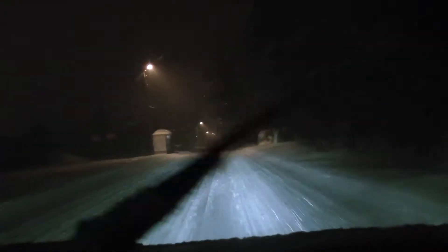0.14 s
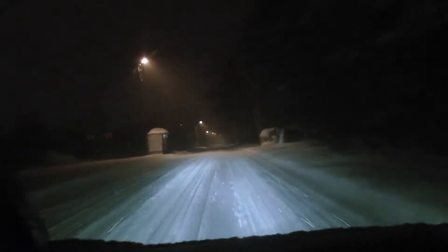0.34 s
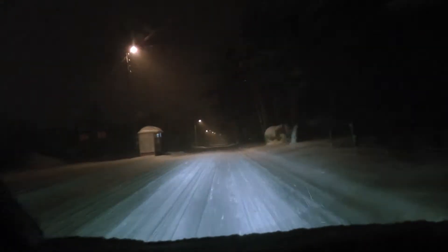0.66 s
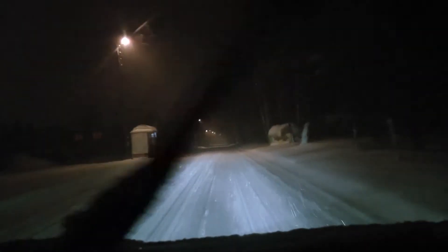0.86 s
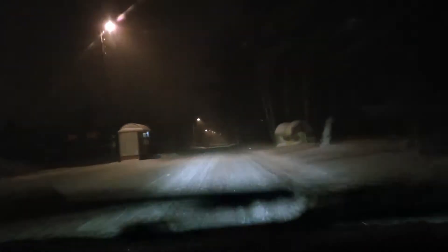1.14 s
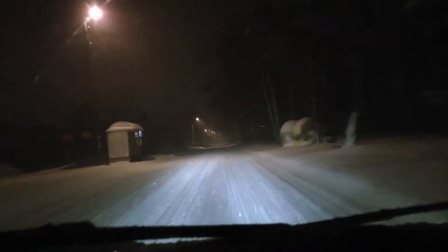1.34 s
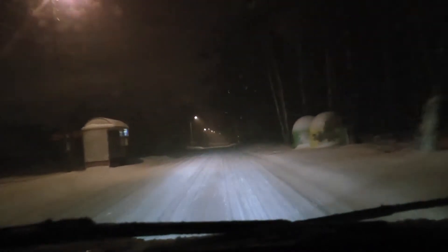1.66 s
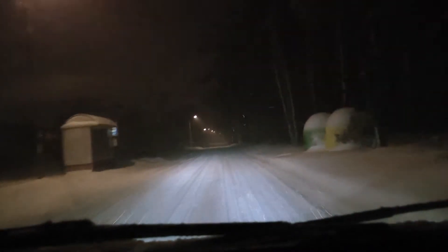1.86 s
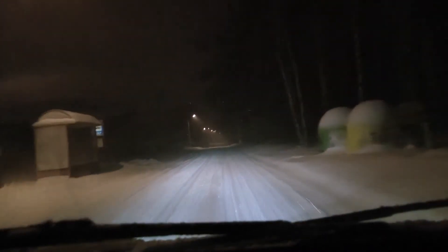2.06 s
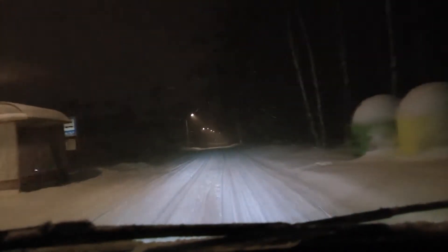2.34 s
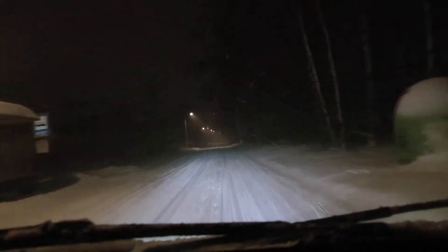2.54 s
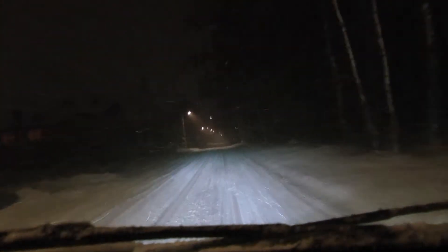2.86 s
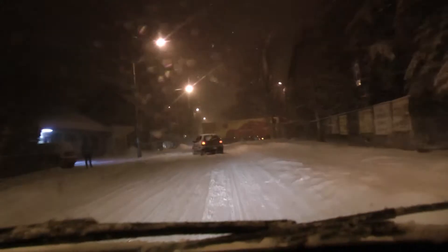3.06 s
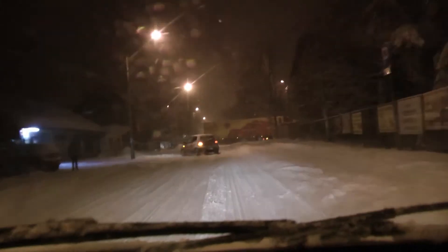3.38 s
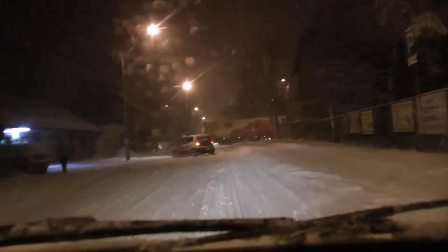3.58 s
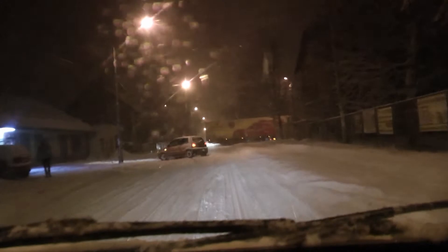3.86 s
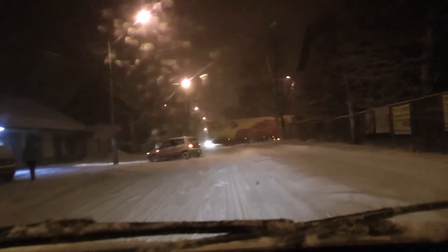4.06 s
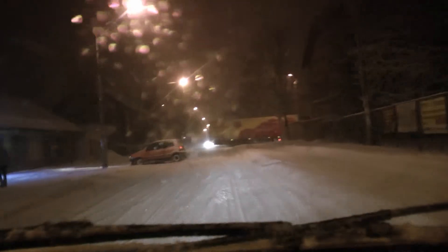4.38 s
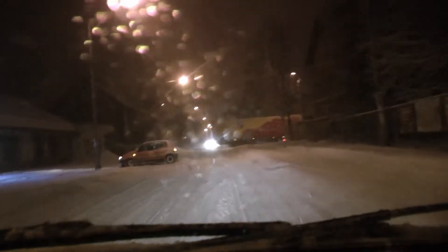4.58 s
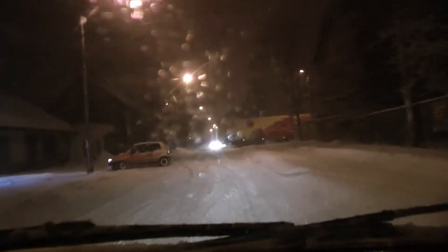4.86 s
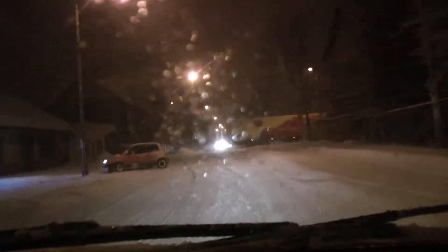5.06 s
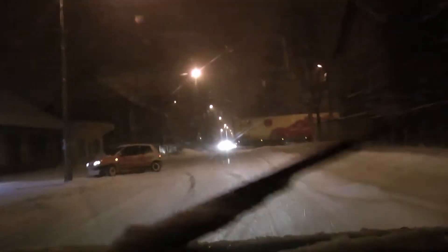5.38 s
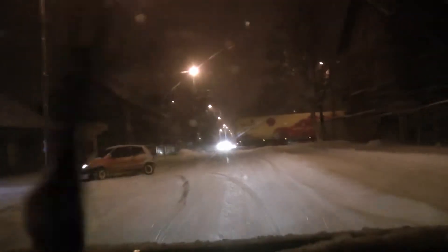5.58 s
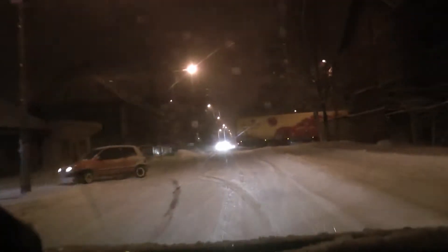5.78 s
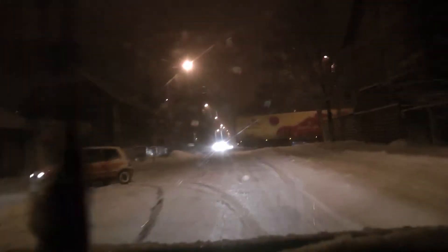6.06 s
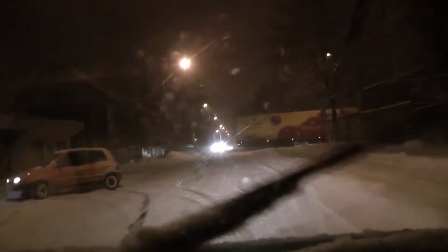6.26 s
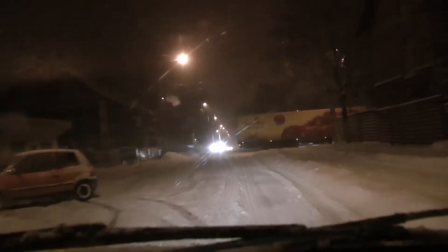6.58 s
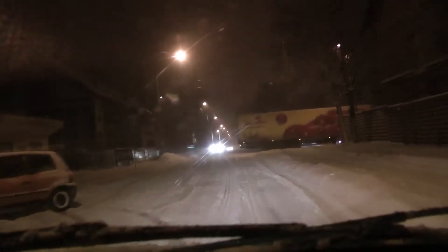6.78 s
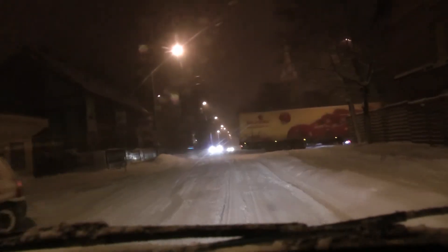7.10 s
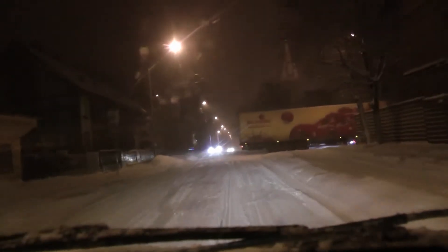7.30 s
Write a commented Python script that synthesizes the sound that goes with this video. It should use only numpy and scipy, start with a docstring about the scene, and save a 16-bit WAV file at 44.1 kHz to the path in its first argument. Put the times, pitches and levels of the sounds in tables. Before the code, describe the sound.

Deep cabin rumble with faint gear whine suddenly drops to soft slow rolling, then a stalk clunks, an indicator relay ticks and hands squeak briefly.

```python
"""Tyre rumble booms in a car cabin on a snowy road at night, over engine hum, a gear whine and the heater fan.
The scene then jumps to a slow, quieter street: cloth rustles, stalk and relay click, a hand squeaks on the wheel.
Tyres, cloth and air are coloured noise, motors are wavering sines, clicks are dying noise puffs and rung modes.
Everything is built as mid and side, then heard by a close pair of microphones with almost the same bass."""
import sys
import numpy as np
from scipy import signal
from scipy.fft import rfft, irfft, next_fast_len
from scipy.io import wavfile
from scipy.ndimage import uniform_filter1d

SR = 44100
rng = np.random.default_rng(int(sys.argv[2]) if len(sys.argv) > 2 else 0)


def int16_out(signal):
    """Quantize to a 16-bit WAV file."""
    q = np.round(np.clip(np.atleast_2d(signal).T, -1, 1) * 32767)
    wavfile.write(sys.argv[1], SR, q.astype(np.int16))


N = 328086
T = np.arange(N) / SR
SIZE = next_fast_len(N)  # transform length
HZ = np.fft.rfftfreq(SIZE, 1 / SR) + 1e-9  # kept above zero for the logarithms
JUMP_S, JUMP_FADE_S = 2.919, .0008  # from the fast road to the slow street


def undb(db):
    """Decibel law: amplitude gain of a level in dB."""
    return 10 ** (np.asarray(db) / 20)


def unit(x):
    """Normalisation of power: scaled to rms 1."""
    return x / np.sqrt(np.mean(x ** 2))


def shape(table):
    """Spectral envelope: gain per frequency bin, straight in dB over log frequency between points."""
    hz, db = np.transpose(table)
    return undb(np.interp(np.log(HZ), np.log(hz), db))


def walk(rate):
    """Slow random modulation: levels held 1 / rate seconds and smoothed twice, with a spread near 1."""
    hold = int(SR / rate)
    levels = np.repeat(rng.standard_normal(N // hold + 1), hold)
    return 1.15 * uniform_filter1d(uniform_filter1d(levels, hold), hold)[:N]


def noise(gain, flicker_db, rate):
    """Filtered noise for mid and side, whose octave bands are modulated independently."""
    spec = rfft(rng.standard_normal((2, SIZE))) * gain
    out = 0
    for k in range(5, 15):  # octaves centred on 2 ** k Hz
        octave = np.cos(np.pi / 2 * np.clip(np.log2(HZ) - k, -1, 1)) ** 2
        if np.max(octave * gain) > 1e-3 * np.max(gain):  # skip nearly empty octaves
            band = irfft(spec * octave, SIZE)[:, :N]
            out = out + band * undb(flicker_db * walk(rate))
    return unit(out)


def tone(hz, db, waver_db):
    """Phase integration: a sine of given frequency whose strength wavers about an rms level."""
    phase = 2 * np.pi * np.cumsum(hz * np.ones(N)) / SR
    return np.sqrt(2) * undb(db + waver_db * walk(12)) * np.sin(phase)


def burst(s, db, lo_hz, hi_hz, t60, rise):
    """Exponential decay of band noise in mid and side; returns the start sample and the sound."""
    t = T[:SR // 10]
    sos = signal.butter(2, [lo_hz, hi_hz], "band", fs=SR, output="sos")
    puff = unit(signal.sosfilt(sos, rng.standard_normal((2, len(t)))))
    decay = 1000. ** (-t / t60)  # down 60 dB after t60 seconds
    return int(s * SR), undb(db) * puff * decay * np.minimum(t / rise, 1)


def ring(modes, scatter_db):
    """Modal superposition: one blow sums decaying sines, each a little different every time."""
    t = T[:SR // 12]
    out = 0
    for hz, db, t60 in modes:
        a, b, c = rng.standard_normal(3)
        sine = np.sin(2 * np.pi * hz * (1 + .025 * b) * t + np.pi * c)
        out = out + undb(db + scatter_db * a) * 1000. ** (-t / t60) * sine
    return out


def add(out, start, sound):
    """Linear superposition: mixes a short sound in from a sample onward."""
    out[..., start:start + sound.shape[-1]] += sound[..., :N - start]


# Tyre force spectra ahead of the cabin. Each row: frequency in Hz, relative density in dB per Hz.
RUMBLE_FAST = [(20, -27), (35, -30), (48, -11), (75, -10.5), (120, -3.5), (165, -10.5), (230, -11),
               (300, -16.5), (450, -21)]
RUMBLE_SLOW = [(20, -26), (35, -13), (48, -7.5), (75, -5.5), (120, -5.5), (165, -11), (230, -11),
               (300, -12), (450, -23)]
# Packed snow spectra ahead of the cabin. Each row: frequency in Hz, relative density in dB per Hz.
CRUNCH_FAST = [(210, -41), (350, -3.5), (537, -4), (623, -8.5), (722, -11.5), (929, -16), (1030, -19.5),
               (1160, -21.5), (1560, -24.5), (1700, -22), (2060, -27.5), (12000, -54), (15600, -84),
               (22000, -120)]
CRUNCH_SLOW = [(210, -62), (350, -13.5), (491, -7), (578, 0), (639, -8), (742, -4.5), (954, -21.5),
               (1290, -22.5), (1410, -20.5), (1560, -25), (1700, -14.5), (2210, -25), (7000, -37),
               (9100, -69), (15400, -120)]
# Cabin resonances. Each row: frequency in Hz, width in Hz, lift in dB.
CABIN_MODES = [(53.4, 22, 4), (102.3, 15.4, 4.5), (134.2, 31, 5), (193.6, 15.2, 9), (244.6, 22, 7.5),
               (353.4, 18, 2.5), (561, 35, 2.5), (720, 150, 6), (1090, 165, 6), (1396, 86, 4.5)]


def road(rumble, crunch, rumble_db, crunch_db):
    """Forced resonance: tyre forces through the body boom in the cabin modes; packed snow crunches above."""
    lift_db = sum(db / (1 + (2 * (HZ - hz) / width) ** 2) for hz, width, db in CABIN_MODES)
    cabin = undb(lift_db)
    low = noise(shape(rumble + [(900, -61)]) * cabin, flicker_db=1.0, rate=6)
    high = noise(shape(crunch) * cabin, flicker_db=1.0, rate=17)
    return undb(rumble_db) * low + undb(crunch_db) * high


# Tyre levels ahead of the bumps, as a fast then a slow list.
# Each row: time in seconds, rumble in dB, snow crunch in dB.
ROAD_LEVELS = [
    [(0, -12.5, -29.5), (1.5, -11.5, -30), (2.3, -13, -29.5), (2.919, -14, -27.5)],
    [(2.92, -24, -45), (3.5, -24, -44), (4.1, -25, -44), (4.3, -21, -40.5), (4.6, -27, -44),
     (5.15, -20.5, -40), (5.4, -22, -40.5), (5.9, -19.5, -40), (6.2, -24.5, -42), (6.5, -21, -40),
     (6.8, -25, -43.5), (7.15, -20.5, -41.5), (7.44, -22.5, -42.5)],
]
ROAD_BUMPS_DB, ROAD_BUMPS_PER_S = 1.64, 12


def tyres():
    """Common modulation: uneven snow shakes all tyre bands together, on the fast and then the slow road."""
    s, *columns = np.transpose(ROAD_LEVELS[0] + ROAD_LEVELS[1])
    bumps_db = ROAD_BUMPS_DB * walk(ROAD_BUMPS_PER_S)
    rumble_db, crunch_db = (np.interp(T, s, column) + bumps_db for column in columns)
    over = np.clip((T - JUMP_S) / JUMP_FADE_S, 0, 1)
    fast = road(RUMBLE_FAST, CRUNCH_FAST, rumble_db, crunch_db)
    slow = road(RUMBLE_SLOW, CRUNCH_SLOW, rumble_db, crunch_db)
    return (1 - over) * fast + over * slow


def snow_crunches():
    """Random impulses: soft snow crunches fall by chance, each a puff in its own band."""
    out = np.zeros((2, N))
    for a, b, c in rng.random((320, 3)):
        lo_hz, hi_hz = 800 * 3.5 ** c, 1900 * 1.96 ** c
        add(out, *burst(a * T[-1], -60 + 14 * b ** 2, lo_hz, hi_hz, t60=0.089, rise=0.0016))
    return out


# Engine hum. Each row: time in seconds, firing rate in Hz, level in dB.
ENGINE = [(0, 50, -25), (1.5, 51.5, -25.5), (2.92, 52.9, -24.5)]
# Gear whine. Each row: time in seconds, frequency in Hz, level in dB.
WHINE = [(0, 1000, -52), (.25, 993, -45.5), (2, 1013, -47), (2.92, 1017, -44.5)]


def drive():
    """Periodic excitation: firing hum and gear whine while the car pulls at speed."""
    out = 0
    for table in (ENGINE, WHINE):
        s, hz, db = np.transpose(table)
        out = out + tone(np.interp(T, s, hz), np.interp(T, s, db), waver_db=1.5)
    return out * np.clip((JUMP_S - T) / JUMP_FADE_S, 0, 1)


# Relay case modes. Each row: frequency in Hz, relative level in dB, 60 dB decay time in seconds.
RELAY_MODES = [(2357, -4.5, 0.076), (3120, -9, 0.085), (4310, -7, 0.068), (4500, 0, 0.078),
               (6150, -6, 0.071), (6500, 2, 0.036), (7240, -6, 0.07), (9394, -34, 0.082),
               (10470, -27, 0.042), (11500, -30, 0.1)]
# The stalk pushes the same contacts before the blinking. Each row: time in seconds, crack level in dB.
LATCH = [(4.6954, -44), (4.7284, -27)]
RELAY_FIRST_S, RELAY_PERIOD_S, RELAY_CLOSED_S, RELAY_BLINKS = 4.7725, .7268, .3757, 4
RELAY_CLOSE_DB, RELAY_OPEN_DB = -29.5, -37  # cracks
RELAY_RING_DB = -11.5  # the case relative to the crack


def relay_blows():
    """Periodic switching: the flasher closes once a period and opens, softer, about half-way through."""
    closes = RELAY_FIRST_S + RELAY_PERIOD_S * np.arange(RELAY_BLINKS)
    closing = [(s, RELAY_CLOSE_DB) for s in closes]
    opening = [(s + RELAY_CLOSED_S, RELAY_OPEN_DB) for s in closes]
    return LATCH + closing + opening


def relay():
    """Impact excitation: each blow cracks, and its bouncing contact rings the case modes."""
    out = np.zeros((2, N))
    for s, db in relay_blows():
        add(out, *burst(s, db, lo_hz=1260, hi_hz=10900, t60=0.063, rise=0.001))
        for lag, bounce_db in ((0, 1.5), (.003, -11), (.007, -6)):  # bounces: seconds, dB
            gain = undb(db + RELAY_RING_DB + bounce_db)
            add(out[0], int((s + lag) * SR), gain * ring(RELAY_MODES, scatter_db=5.0))
    return out


# The stalk spring sings as it latches. Each row: time in seconds, level in dB before decay.
STALK = [(4.708, -39), (4.729, -29)]


def stalk_spring():
    """Narrow-band decay: the latching spring sings as a dying band of noise."""
    out = np.zeros((2, N))
    for s, db in STALK:
        add(out, *burst(s, db, lo_hz=5230, hi_hz=6160, t60=0.076, rise=.002))
    return out


# Dull knocks through the dashboard. Each row: time in seconds, level in dB before decay.
THUMPS = [(4.73, -22.5), (5.845, -18), (5.875, -23), (5.92, -27), (5.949, -38)]


def dashboard_knocks():
    """Structure-borne impact: each knock is a low dying puff, in the mid signal only."""
    out = np.zeros((2, N))
    for s, db in THUMPS:
        start, puff = burst(s, db, lo_hz=100, hi_hz=414, t60=0.16, rise=0.0084)
        add(out[0], start, puff[0])
    return out


# Trim ticks and creaks. Each row: time in seconds, level in dB before decay, treble relative to it in dB.
TICKS = [(0.6143, -34, -18), (1.303, -46, 0), (1.3364, -44, -5), (1.3603, -46, 2.5), (1.4398, -41, -11),
         (1.765, -47, -1.5), (1.855, -49, 0), (2.11, -41, -2), (3.178, -48, -12), (3.707, -41, -12),
         (4.105, -46, -20), (4.2486, -41, -14), (4.2987, -40, -8), (4.5037, -40.5, -13), (4.737, -31, -10),
         (4.865, -43.5, -12), (5.024, -39.5, -19), (5.281, -40.5, -17), (5.4275, -38.5, -14),
         (5.591, -39, -15), (5.6999, -42.5, -20), (5.8202, -39, 1), (5.8371, -35, -6), (5.8642, -36, -7),
         (5.895, -39, -5), (5.904, -38.5, 3), (5.9183, -33, -4), (5.9476, -34, -18), (5.9714, -44.5, 7.5),
         (6.031, -44, 1.5), (6.0584, -48.5, 4), (6.084, -41, -10), (6.129, -43, -10), (6.2787, -44, -8),
         (6.323, -43, -18), (6.389, -39, -14), (6.414, -38.5, -13), (6.5806, -34.5, -22),
         (6.848, -39.5, -6), (7.425, -37, -9)]
# Trim modes. Each row: frequency in Hz, relative level in dB, 60 dB decay time in seconds.
TRIM_MODES = [(1110, -10, .03), (1706, 12.5, 0.038), (2380, -2, .03), (2890, -3.5, 0.03), (3780, -9.5, .03),
              (5750, -4, .035)]
TICK_T60_S, TRIM_RING_DB = 0.056, -13.5  # decay; modes relative to the tick


def trim_ticks():
    """Impulse response: ticks, the faint ones by chance, are two-band puffs that ring the trim modes."""
    out = np.zeros((2, N))
    faint = [(a * T[-1], -51 + 7 * b, -16 + 16 * c) for a, b, c in rng.random((40, 3))]
    for s, db, treble_db in TICKS + faint:
        add(out, *burst(s, db, lo_hz=900, hi_hz=3880, t60=TICK_T60_S, rise=0.0026))
        add(out, *burst(s, db + treble_db, lo_hz=4600, hi_hz=13000, t60=TICK_T60_S, rise=0.0015))
        add(out[0], int(s * SR), undb(db + TRIM_RING_DB) * ring(TRIM_MODES, scatter_db=4))
    return out


# Two short chirps, then one long squeak, as one list each.
# Each row: time in seconds, mean slip rate in Hz, level in dB that scales both stack and scrape.
SQUEAKS = [
    [(5.978, 3830, -52), (6.005, 3700, -56)],
    [(6.577, 2970, -49), (6.595, 2900, -45)],
    [(6.751, 3700, -50), (6.766, 3170, -45.5), (6.785, 2620, -42), (6.805, 2370, -45), (6.828, 2330, -45),
     (6.848, 2800, -52)],
]
# Relative level in dB of each multiple of the slip rate, from the first up.
SQUEAK_ORDERS = [-0.5, -3, -6, -7, -16]


def squeak(rows):
    """Stick-slip: skin on the rim gives a rough gliding stack of multiples in a scraping hiss."""
    s, hz, db = np.transpose(rows)
    rough_hz = np.interp(T, s, hz) * (1 + .045 * walk(1100))
    phase = 2 * np.pi * np.cumsum(rough_hz) / SR
    gate = np.interp(T, [s[0] - .004, s[0], s[-1], s[-1] + 0.012], [0, 1, 1, 0])
    stack = 0
    for order, order_db in enumerate(SQUEAK_ORDERS, 1):
        stack = stack + undb(order_db + 3 * walk(90) + 4 * walk(450)) * np.sin(order * phase)
    sos = signal.butter(2, [2500, 11000], "band", fs=SR, output="sos")
    scrape = signal.sosfilt(sos, rng.standard_normal(N))
    return gate * undb(np.interp(T, s, db)) * (stack + 1.1 * scrape)


# Cloth spectrum. Each row: frequency in Hz, relative density in dB per Hz.
CLOTH = [(1180, -24), (2000, 0.5), (3660, -5), (4090, -1), (4460, -3.5), (5440, -0.5), (8160, -5.5),
         (12000, -5.5), (15700, -17)]
# Cloth and hands moving. Each row: start, rise, hold and fall in seconds,
# gain in dB below 8 kHz, gain in dB above 8 kHz.
MOVEMENTS = [(0.066, 0.036, .01, 0.054, -47, -47), (.2, .08, .01, 0.088, -49, -48),
             (0.437, 0.036, .02, 0.04, -57, -53), (0.754, 0.067, .01, 0.062, -51, -52),
             (1.24, 0.062, .03, .12, -58, -58), (2.07, .04, .02, .07, -61, -60),
             (2.883, 0.012, 0.12, 0.091, -52, -46), (2.995, 0.37, 0.37, .07, -54.5, -46),
             (3.72, 0.028, 0.21, .06, -55.5, -58), (4.202, 0.048, 0.22, 0.11, -48, -48.5),
             (4.836, 0.065, 0.057, 0.14, -50.5, -46.5), (5.8, 0.028, 0.082, .15, -47.5, -52),
             (6.343, 0.099, .02, .1, -56, -54)]
# Restless cloth between movements. Each row: time in seconds, gain in dB.
CLOTH_REST = [(0, -68.5), (2.9, -65), (4.1, -62.5), (4.7, -56.5), (6.1, -59.5), (7.44, -61.5)]
RUSTLE_FADE_DB = 12  # how far a movement sinks over its rise and fall


def rustle():
    """Friction noise, powers adding: movements swell, hold and fade over restless cloth, each with its treble."""
    cloth = noise(shape(CLOTH), flicker_db=1.5, rate=45)
    top = irfft(rfft(cloth, SIZE) / (1 + (8000 / HZ) ** 6), SIZE)[:, :N]
    power = undb(np.interp(T, *np.transpose(CLOTH_REST))) ** 2
    for s, rise, hold, fall, *band_db in MOVEMENTS:
        before = (s + rise - T) / max(rise, .005)
        after = (T - s - rise - hold) / max(fall, .005)
        envelope = undb(-RUSTLE_FADE_DB * np.clip(np.maximum(before, after), 0, 9))
        power = power + np.outer(undb(band_db), envelope) ** 2
    return np.sqrt(power[0]) * (cloth - top) + np.sqrt(power[1]) * top


# Fan motor tones, a little lower in the slow stretch. Each row: a fast then a slow triple of
# frequency in Hz, centre level in dB, side level in dB.
FAN_TONES = [((836.5, -50, -54), (834, -64, -61.5)), ((1674, -54, -69), (1660, -61, -91))]


def fan_motor():
    """Rotating-machine tones: wavering sines for mid and side."""
    fast = T < JUMP_S
    mid, side = 0, 0
    for pair in FAN_TONES:
        hz, centre_db, side_db = (np.where(fast, a, b) for a, b in zip(*pair))
        mid = mid + tone(hz, centre_db, waver_db=4.0)
        side = side + tone(hz, side_db, waver_db=2.5)
    return mid, side


# Vent air. The single row: centre frequency in Hz, width in Hz, level in dB.
FAN_AIR = (1722, 93, -57)


def fan_air():
    """Band-limited flow noise: air rushes through the vent in one narrow throbbing band."""
    hz, width, db = FAN_AIR
    return undb(db) * noise(1 / (1 + (2 * (HZ - hz) / width) ** 4), flicker_db=4.0, rate=22)


# Air hiss spectrum. Each row: frequency in Hz, relative density in dB per Hz.
AIR = [(1500, -5), (3000, -2.5), (5000, -0.5), (7000, -8), (10000, -10), (12500, -17), (15800, -19)]
AIR_FAST_DB, AIR_SLOW_DB = -56, -63


def air_hiss():
    """Broadband flow noise: a flickering hiss, softer in the slow stretch."""
    level_db = np.where(T < JUMP_S, AIR_FAST_DB, AIR_SLOW_DB)
    return undb(level_db) * noise(shape([(800, -36.0)] + AIR), flicker_db=3.2, rate=20)


# Side gain of the steady noise. Each row: frequency in Hz, side relative to mid in dB.
SIDE_GAIN = [(30, -26), (60, -36), (110, -32), (200, -30.5), (380, -21), (700, -12), (1290, -8),
             (2380, -3.5), (4400, -16.5), (6500, -42), (9000, -10.5), (15000, 4.5)]
LEFT_LEAN = .09  # share of the mid treble sent to the side


def scene():
    """Mid-side stereo: sources sum as mid and side, then spread over the two microphones."""
    mid, side = tyres() + rustle() + air_hiss() + fan_air()
    tick_mid, tick_side = relay() + trim_ticks() + stalk_spring() + dashboard_knocks() + snow_crunches()
    rub = sum(squeak(rows) for rows in SQUEAKS)
    mid = mid + drive() + rub + tick_mid
    # the steady noise gets a side share set per frequency; the treble leans left
    noise_side = rfft(side, SIZE) * shape(SIDE_GAIN)
    lean = rfft(mid, SIZE) * LEFT_LEAN / (1 + (900 / HZ) ** 4)
    side = irfft(noise_side + lean, SIZE)[:N]
    side = side + 0.16 * rub + 0.38 * tick_side  # the squeak sits a little left, clicks and ticks spread wide
    fan_mid, fan_side = fan_motor()
    mid, side = mid + fan_mid, side + fan_side
    return np.array([mid + side, mid - side])


TOP_HZ = 15800


def record(dry):
    """Soft saturation and band limiting: the recorder rounds the loudest peaks and cuts the top."""
    rounded = .95 * np.tanh(dry / .95)
    return signal.sosfilt(signal.ellip(12, .2, 80, TOP_HZ, fs=SR, output="sos"), rounded)


dry = scene()
out = record(dry)
int16_out(out)
```